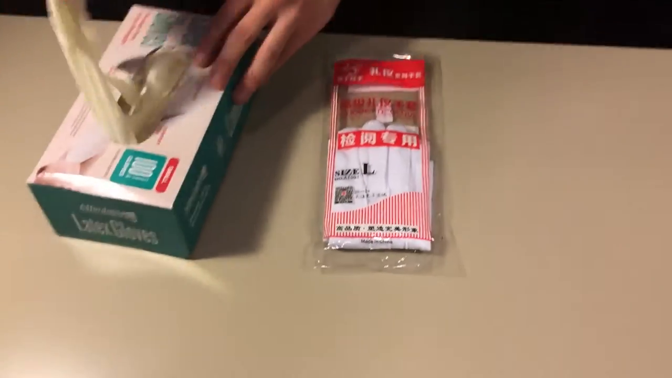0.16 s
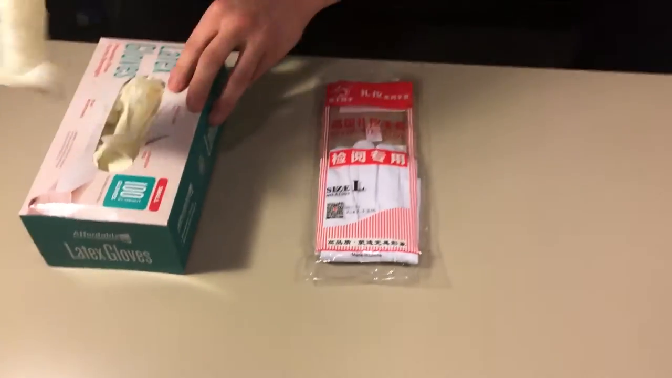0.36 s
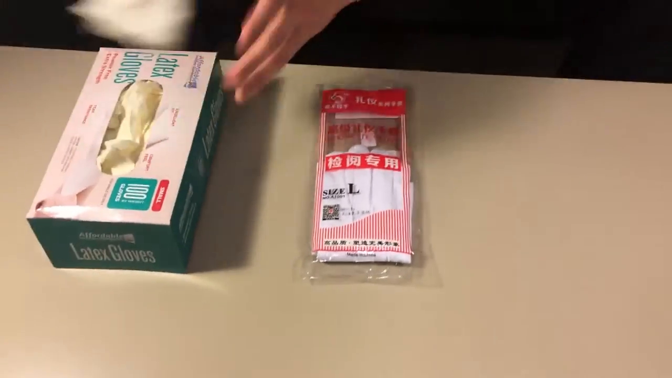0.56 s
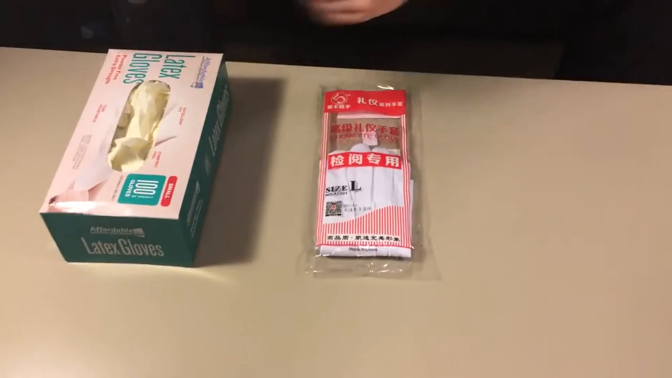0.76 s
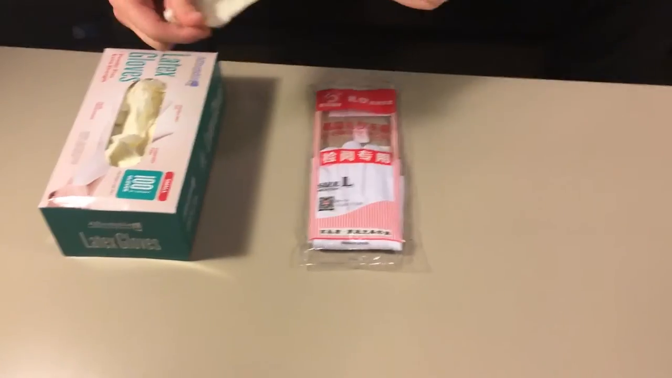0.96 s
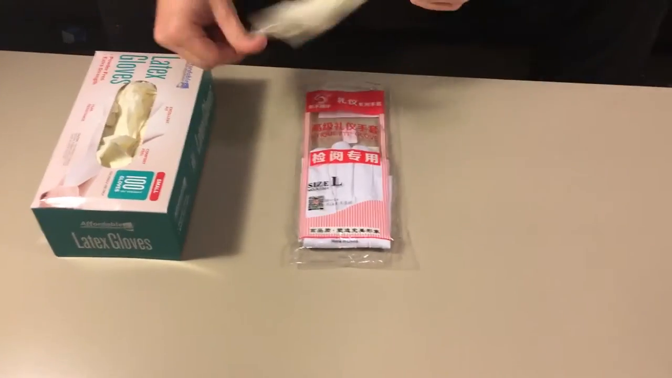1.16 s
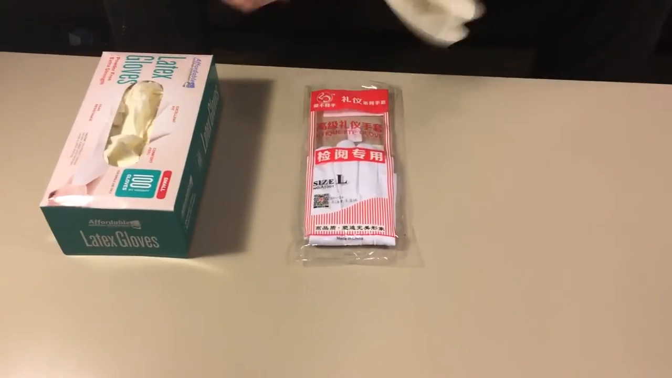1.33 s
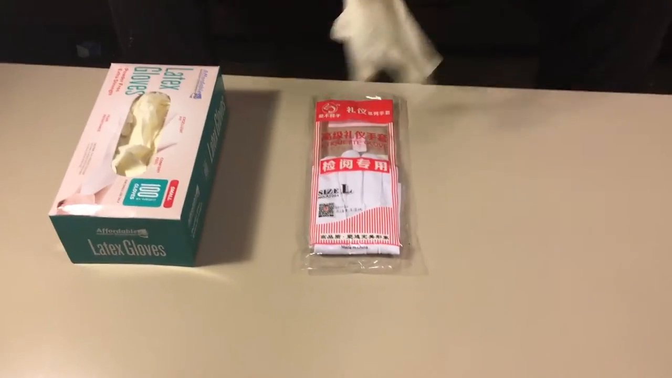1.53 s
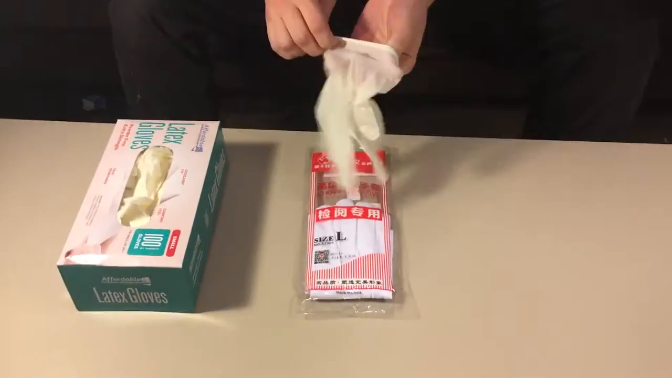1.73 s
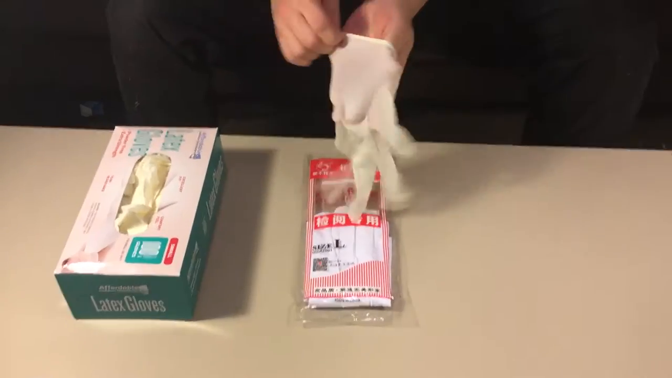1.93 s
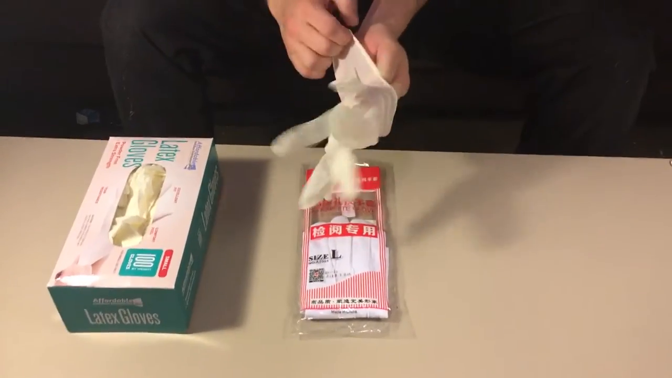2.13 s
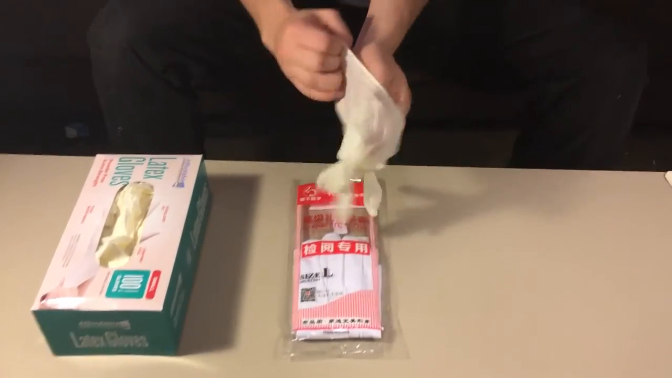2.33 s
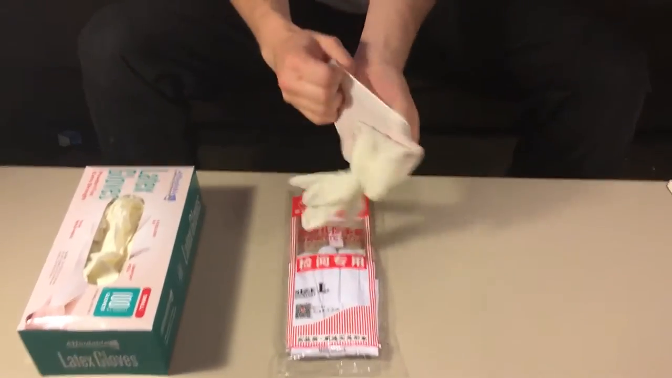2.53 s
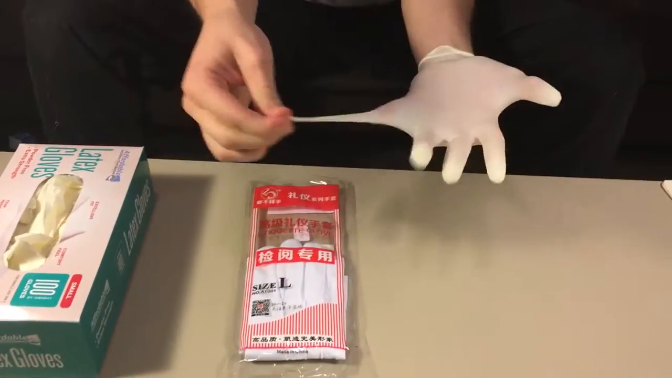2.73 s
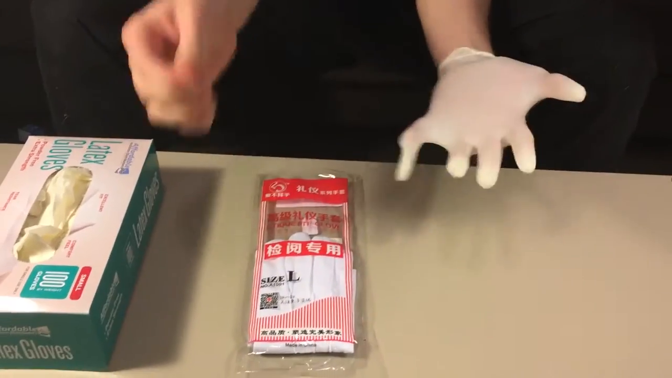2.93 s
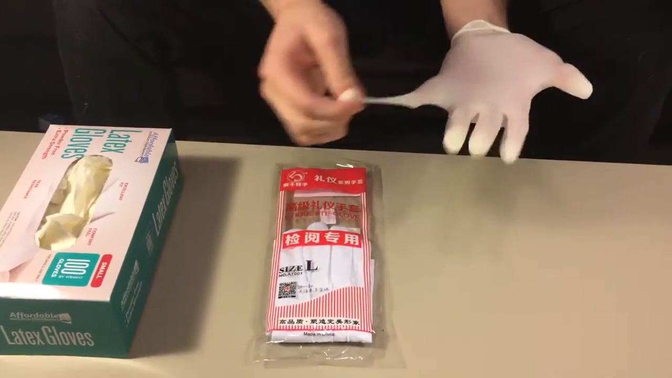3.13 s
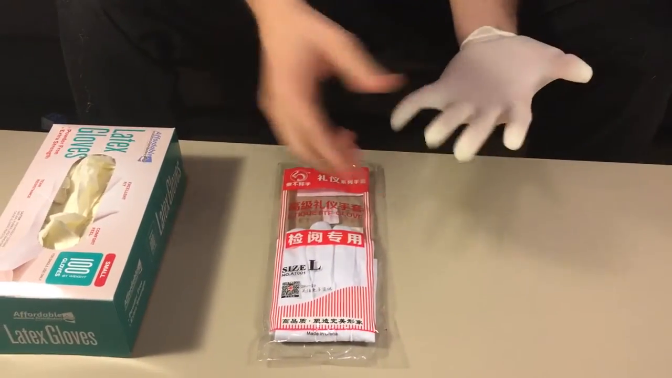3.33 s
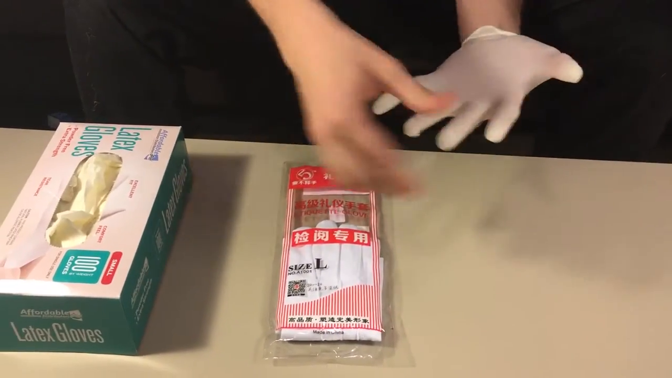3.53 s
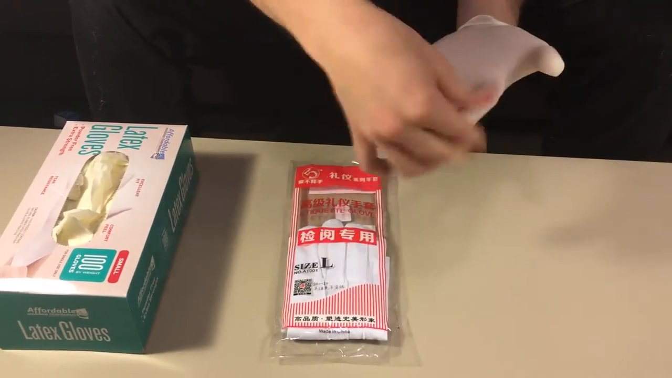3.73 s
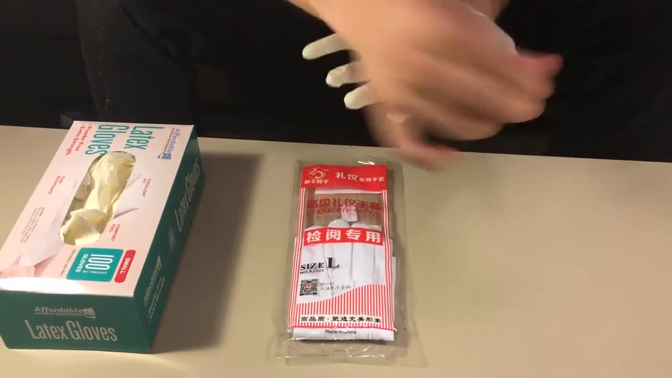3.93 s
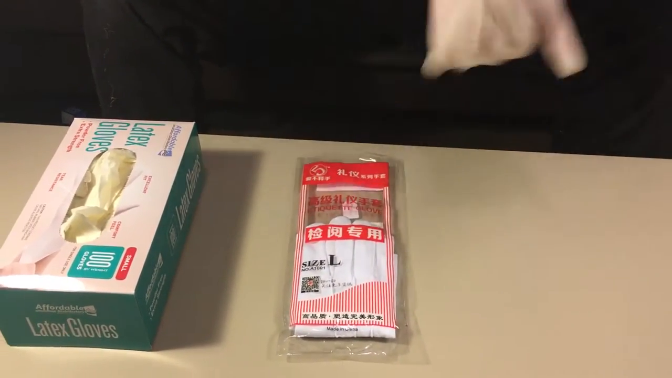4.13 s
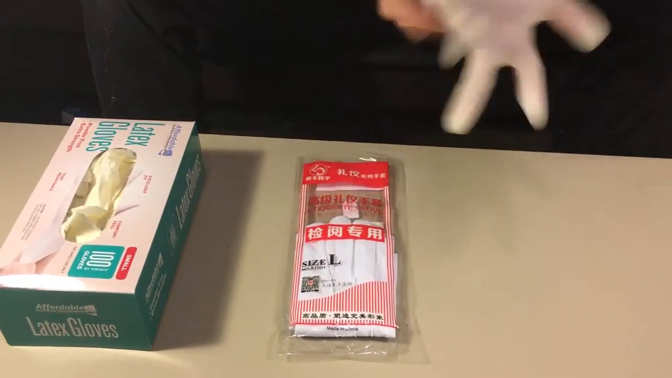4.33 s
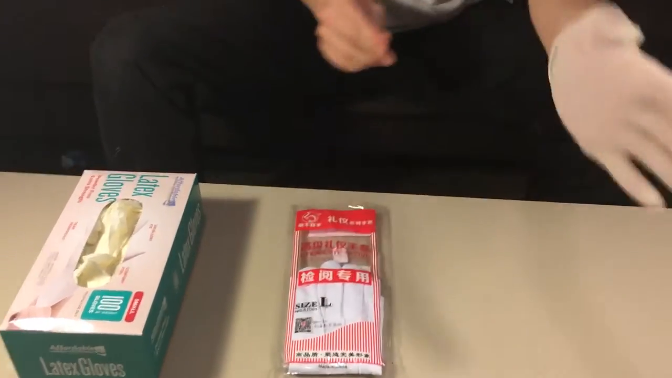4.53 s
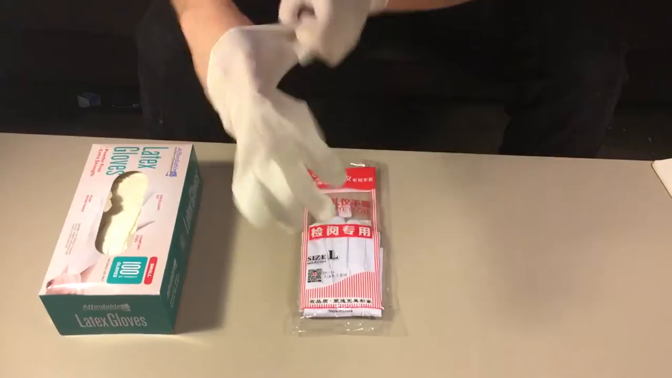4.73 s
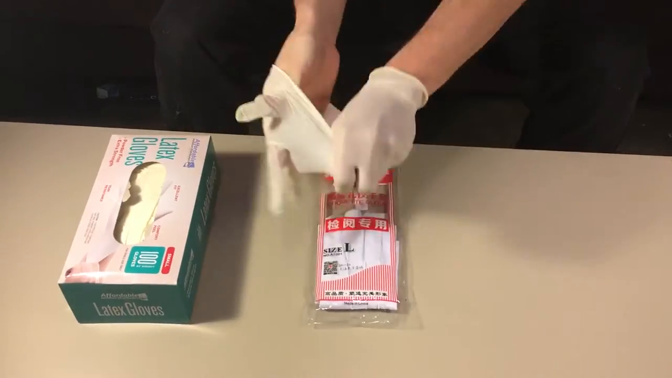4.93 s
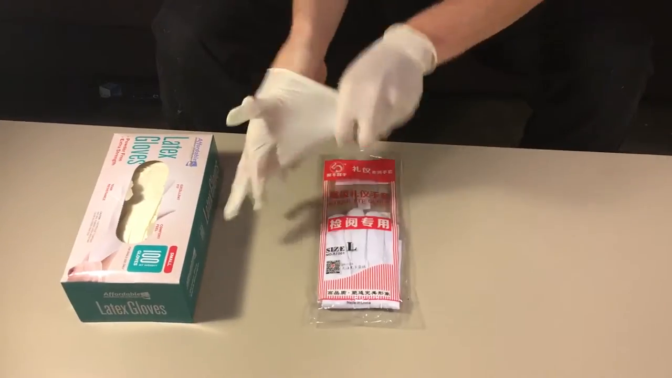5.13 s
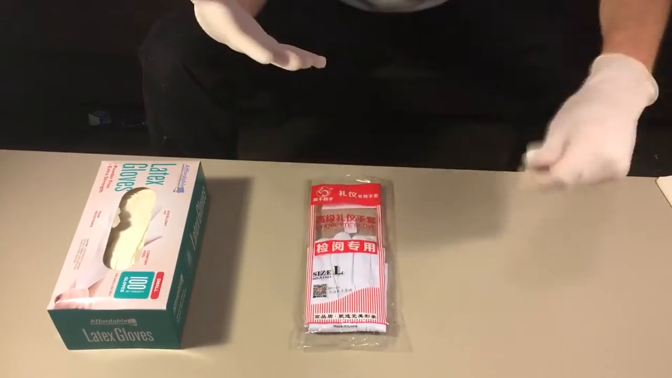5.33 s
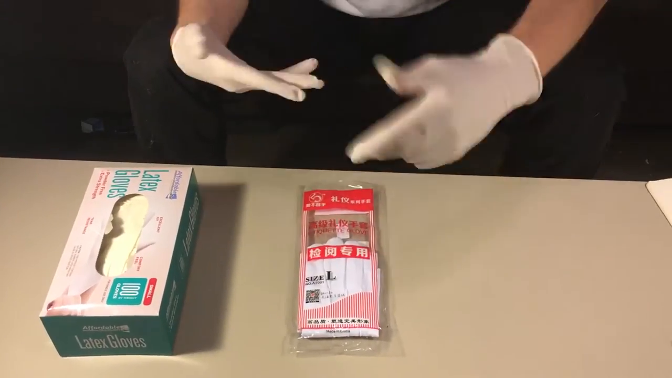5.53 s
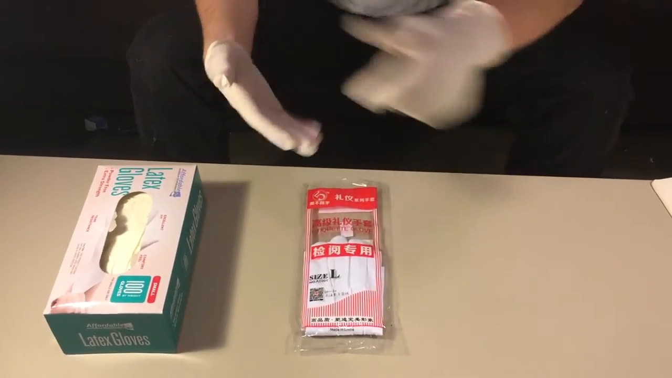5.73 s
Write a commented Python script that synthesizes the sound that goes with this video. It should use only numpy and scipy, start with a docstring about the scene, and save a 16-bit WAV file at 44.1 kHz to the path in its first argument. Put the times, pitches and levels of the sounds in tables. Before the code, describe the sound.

A quiet room holds a low, slightly wavering mains hum and faint air. From 0.1 to 0.3 s a latex glove drags out of a cardboard box in a growing rubbery rustle, ending in soft hollow flaps until 0.4 s. From 0.75 to 1.4 s only faint hissy brushes remain. Rubbing thickens from 1.6 s, with small flicks and the first moderate cracks at 2.1 and 2.3 s. A loud, sharp snap comes at 2.9 s, then a run at 3.3, 3.5, 3.7, 3.85, 4.0 and 4.2 s, some brighter. A very brief quickening creak near 4.5 s leads into the strongest, fullest snap. From 4.7 to 4.95 s slack rubber flaps and slaps in a dense flurry, followed by crisp snaps at 5.25, 5.35, 5.6 and 5.7 s. Everything is close, with a slight table reflection and a room ring that cuts off abruptly.

```python
"""In a quiet room with a low hum, latex gloves are first dragged from a cardboard box, rubbing and flapping.
Light brushes follow, then longer rubbing and the first snaps: stretched rubber cracks against skin.
A run of louder snaps comes next; a quickening creak leads to the strongest, then a burst of flaps and more snaps.
Blows are shaped bursts of noise, rubbing is a stream of tiny slips, and the hum is made of wavering sines.
A table top and the room send the sound back; the room's ring stops abruptly at set times."""
import sys
import numpy as np
from scipy import signal
from scipy.fft import rfft, irfft
from scipy.io import wavfile
from scipy.ndimage import uniform_filter1d

SR = 44100
rng = np.random.default_rng(int(sys.argv[2]) if len(sys.argv) > 2 else 0)


def wav_record(signal):
    """Record a signal, one row per channel, as 16-bit PCM in the file named by sys.argv[1]."""
    frames = np.transpose(np.atleast_2d(signal))
    bounded = np.clip(frames, -1, 1)
    # unit amplitude maps onto the largest positive 16-bit level
    quanta = np.round(bounded * 32767).astype(np.int16)
    wavfile.write(sys.argv[1], SR, quanta)


N = 254917  # samples in the whole scene
BLOW_SIZE, LEAD = 4096, 256  # samples in one blow, and those of them before it lands
BLOW_HZ = np.fft.rfftfreq(BLOW_SIZE, 1 / SR)


def gain_of(db):
    """Turns decibels into an amplitude factor."""
    return 10 ** (np.asarray(db) / 20)


def evened(x):
    """Scales a signal to an average strength (rms) of 1."""
    return x / np.sqrt(np.mean(x ** 2) + 1e-20)


def read(points, hz):
    """Reads a curve of (frequency, value) points, spacing frequencies as the ear does (log axis)."""
    point_hz, value = np.transpose(points)
    return np.interp(np.log(hz + 1), np.log(point_hz + 1), value)


def bell(hz, centre_hz, octaves):
    """Draws a rounded peak of height 1 over frequency."""
    return np.exp(-.5 * (np.log2((hz + 1) / centre_hz) / octaves) ** 2)


def coloured(x, points):
    """Filters a signal by a spectrum in dB, then scales it to rms 1."""
    spectrum_gain = gain_of(read(points, np.fft.rfftfreq(N, 1 / SR)))
    return evened(irfft(rfft(x) * spectrum_gain, N))


def wander(rate_hz):
    """Makes a slow random motion of rms 1 by keeping only the lowest frequencies of noise."""
    hz = np.fft.rfftfreq(N, 1 / SR)
    slow = rfft(rng.standard_normal(N)) / (1 + (hz / rate_hz) ** 4)
    return evened(irfft(slow, N))


def add(mix, s, sound):
    """Mixes in a blow that lands at time s."""
    start = max(round(s * SR) - LEAD, 0)
    part = mix[start:][:len(sound)]
    part += sound[:len(part)]


# Mains hum, one row per tone: (frequency [Hz], level [dB rms])
HUM_TONES = [(59.5, -51.5), (119, -57.5)]
# Relative spectrum of the rumble and air: (frequency [Hz], level [dB per Hz])
AIR_SPECTRUM = [(15, -23), (32, -14.5), (55, -5.5), (75, 3), (100, -16.5), (150, -14.5), (200, -14.5),
                (300, -23), (600, -26.5), (1500, -30.5), (4000, -49), (10000, -57), (16000, -55)]
AIR_DB = -51.5  # rms level of rumble and air together


def background():
    """Low rumble and faint air are filtered noise; the hum is sines whose phase wavers."""
    t = np.arange(N) / SR
    hum = np.zeros(N)
    for hz, db in HUM_TONES:
        phase = 2 * np.pi * hz * t + .8 * wander(rate_hz=2.5)
        hum += gain_of(db) * np.sqrt(2) * np.sin(phase)  # root 2 turns rms into peak height
    return hum + gain_of(AIR_DB) * coloured(rng.standard_normal(N), AIR_SPECTRUM)


# Starting tone of the room's ring: (frequency [Hz], relative level [dB])
ROOM_TONE = [(60, 17.5), (150, -1), (330, 6.5), (700, 3), (2000, 2.5), (4000, -0.5), (6500, 0.5),
             (10000, -1.5), (16000, -1.5)]
# How long the ring takes to fall by 60 dB: (frequency [Hz], decay time [s])
ROOM_DECAY = [(150, 0.51), (500, 0.56), (1400, 0.65), (3700, 0.64), (6500, 0.5), (10000, 0.43),
              (16000, 0.3)]
# Single wall echoes: (delay [s], level against the scattered ring as a whole [dB])
WALL_ECHOES = [(0.0212, -19), (0.03, -18), (.0375, -13)]


def room_response(first_s=0.00061, build_s=0.011):
    """Scattered reflections build up, then die band by band, with a few distinct wall echoes."""
    size = SR * 3 // 4
    reflections = rng.standard_normal(size) * (rng.random(size) < 12000 / SR)
    hz, t, bands = signal.stft(reflections, SR, nperseg=256)
    tone_db = read(ROOM_TONE, hz)[:, None]
    fall_db = 60 * t / read(ROOM_DECAY, hz)[:, None]
    ringing = signal.istft(bands * gain_of(tone_db - fall_db), SR, nperseg=256)[1][:size]
    since_first_s = np.maximum(np.arange(size) / SR - first_s, 0)
    ringing *= 1 - np.exp(-since_first_s / build_s)
    ringing /= np.linalg.norm(ringing)
    for delay_s, db in WALL_ECHOES:
        ringing[round(delay_s * SR)] += gain_of(db)
    return ringing


# Moments when the ring of the room stops dead: (time [s])
RING_STOPS = [.747, 1.413, 2.68, 3.18, 3.447, 3.613, 3.813, 3.98, 4.113, 4.413, 4.68, 4.88, 4.98, 5.313,
              5.513, 5.68]


def room(x):
    """Reflections ring on only until the next stop; each stretch draws its own reflections."""
    stretches = np.split(x, [round(s * SR) for s in RING_STOPS])
    rung = [signal.fftconvolve(part, room_response())[:len(part)] for part in stretches]
    return np.concatenate(rung)


def table_echo(x, echo_db=-7, thin_hz=200, dull_hz=2500):
    """The table top throws back a copy about 3 ms later, short of bass and treble."""
    hz = np.fft.rfftfreq(N, 1 / SR)
    delayed = np.exp(-2j * np.pi * hz * .003)
    reflected = hz ** 2 / (hz ** 2 + thin_hz ** 2) / (1 + 1j * hz / dull_hz)
    return irfft(rfft(x) * (1 + gain_of(echo_db) * reflected * delayed), N)


GRIP_S, SLACKEN_S = 0.0027, 0.021  # rise time of a pull, and the time constant of its dying away
BRUSH_S = 0.015  # spread of a brush to either side of its middle (one standard deviation)
RESTING_DB, RESTING_FOLDS_DB = -67.5, -5.5  # the hands are never quite still; folds against hiss


def pull(start_s, end_s, db, growth_db):
    """A drag takes hold, grows with tension (or eases if growth is negative), then slackens."""
    t = np.arange(N) / SR
    tension = np.clip((t - start_s) / (end_s - start_s), 0, 1)
    taking_hold = np.clip((t - start_s) / GRIP_S, 0, 1)
    slackening = np.exp(-np.maximum(t - end_s, 0) / SLACKEN_S)
    return taking_hold * slackening * gain_of(db + growth_db * (tension - 1))


def brush(s, db):
    """Loose rubber passes the fingers lightly: a short, even rise and fall in loudness."""
    return gain_of(db) * np.exp(-.5 * ((np.arange(N) / SR - s) / BRUSH_S) ** 2)


# Glove dragged over card or skin, levels before the final mix: (start [s], end [s], final level [dB],
#   growth [dB], folds against hiss [dB])
DRAGS = [ (0.075, 0.304, -42, 22.5, 3.5), (0.325, 0.391, -47, -4, 0), (0.43, 0.61, -61.5, 13, -6),
         (0.751, 1.387, -63, -3.5, -10), (1.575, 2.67, -57.5, 8.5, 1.5), (1.856, 2.12, -59.5, -2, 2.5),
         (3.255, 3.29, -59.5, 12, 5), (3.435, 4.12, -55.5, 1, 1), (4.122, 4.238, -45, 14, 4.5),
         (4.478, 4.535, -46, 11, 9), (4.677, 4.957, -49.5, 2, 3.5), (4.973, 5.203, -77, -8.5, 16),
         (5.214, 5.242, -48.5, 12, -21), (5.318, 5.355, -52, 1, -12), (5.663, 5.725, -58.5, -4, 2), ]
# Loose rubber brushing past the fingers, before the final mix: (middle time [s], level [dB],
#   folds against hiss [dB])
LIGHT_TOUCHES = [ (0.03, -55.5, -6), (0.774, -59.5, 3), (0.825, -54.5, -8), (0.935, -47.5, -8),
                 (1.005, -54.5, -11), (1.09, -54, -10), (1.17, -51.5, -12), (1.255, -53, -9),
                 (1.37, -59.5, -15), (1.76, -58.5, 6.5), (1.84, -55, 3), (2.454, -51.5, 9),
                 (2.61, -54.5, 0), ]


def sliding():
    """Loudness of hiss and folds over time: the power of all hand movements adds up."""
    moves = [(pull(*row), folds_db) for *row, folds_db in DRAGS]
    moves += [(brush(*row), folds_db) for *row, folds_db in LIGHT_TOUCHES]
    moves += [(gain_of(RESTING_DB), RESTING_FOLDS_DB)]
    hiss_power = sum(level ** 2 for level, _ in moves)
    folds_power = sum((level * gain_of(folds_db)) ** 2 for level, folds_db in moves)
    return np.sqrt(hiss_power), np.sqrt(folds_power)


def friction(spectrum, slips_per_s, spread_db, smooth_db, surge_db):
    """Rubber sticks and lets go in tiny uneven slips over a smooth hiss, coming in surges."""
    sizes = gain_of(spread_db * np.minimum(rng.exponential(1, N), 4))
    happens = rng.random(N) < slips_per_s / SR
    slips = evened(sizes * rng.choice([-1, 1], N) * happens)
    drive = slips + gain_of(smooth_db) * rng.standard_normal(N)
    surges = gain_of(surge_db * wander(rate_hz=20))
    return coloured(drive * surges, spectrum)


# Relative spectrum of the sliding surface: (frequency [Hz], level [dB per Hz])
HISS_SPECTRUM = [(1200, -40), (2500, -9), (4000, 2.5), (6500, -2.5), (9000, -1), (12000, -4), (16000, -11)]
# Relative spectrum of the rustling folds: (frequency [Hz], level [dB per Hz])
FOLD_SPECTRUM = [(80, -4), (200, 1), (350, 6), (600, -1), (1100, -1.5), (2100, 2), (3000, -11),
                 (6000, -7.5), (16000, -55)]
# Relative spectrum of small ticking creases: (frequency [Hz], level [dB per Hz])
CREASE_SPECTRUM = [(200, -16), (1000, -5.5), (3500, 8.5), (8000, 0), (16000, -14)]
CREASES_DB = -9  # creases against hiss


def rubbing():
    """The surface hisses as it slides; loose folds rustle lower down and small creases tick."""
    hiss_level, folds_level = sliding()
    hiss = friction(HISS_SPECTRUM, slips_per_s=1200, spread_db=6, smooth_db=6.0, surge_db=2.0)
    folds = friction(FOLD_SPECTRUM, slips_per_s=460, spread_db=-0.5, smooth_db=-8.5, surge_db=3.5)
    creases = friction(CREASE_SPECTRUM, slips_per_s=98, spread_db=4, smooth_db=-25, surge_db=0.0)
    surface = hiss + gain_of(CREASES_DB) * creases
    return surface * hiss_level + folds * folds_level


def at_level(sound):
    """Fades the ends of a blow and scales it to the energy of rms 1 lasting 10 ms."""
    sound = np.roll(sound, LEAD) * signal.windows.tukey(BLOW_SIZE, .04)
    return sound * np.sqrt(SR / 100 / np.sum(sound ** 2))


def blow(length_ms, colour_db, lag_cycles, shiver_db, shiver_ms, whip_db=-19, whip_ms=1.18, shiver_hz=5000):
    """Rubber whips through the air, lands in a quick run of contacts and shivers out."""
    # time runs from the landing; the moments before it sit at the end of the array
    ms = np.roll(np.arange(BLOW_SIZE) - LEAD, -LEAD) * 1000 / SR
    whip = gain_of(whip_db) * np.exp(-abs(ms) / whip_ms)
    landing = np.where(ms < 0, whip, np.exp(-(ms / length_ms) ** 4))
    shiver = (ms >= 0) * gain_of(shiver_db) * np.exp(-abs(ms) / shiver_ms)
    hard, soft = rfft(rng.standard_normal((2, BLOW_SIZE)) * [landing, shiver])
    # the lossy rubber keeps little treble after the contacts
    contacts = hard + soft / (1 + 1j * BLOW_HZ / shiver_hz)
    # even out the broad spectrum, so that the colour alone sets it
    contacts /= np.sqrt(uniform_filter1d(abs(contacts) ** 2, size=90) + 1e-9)
    # low notes travel more slowly across the sheet and arrive late
    lag = np.exp(-2j * np.pi * lag_cycles * np.log1p(BLOW_HZ / 250))
    return at_level(irfft(contacts * lag * gain_of(colour_db)))


def flap(length_ms, bright_db, ring_hz, ring_db):
    """A softer blow with one broad ring, falling in pitch as the slack sheet settles."""
    tilt_db = bright_db * np.log2((BLOW_HZ + 60) / 1000)
    fold_db = ring_db * bell(BLOW_HZ, ring_hz, octaves=0.29)
    treble_loss = 1 + (BLOW_HZ / 11000) ** 4
    bass_loss = 1 + (230 / (BLOW_HZ + 1)) ** 4
    colour_db = tilt_db + fold_db - 10 * np.log10(treble_loss * bass_loss)
    return blow(length_ms, colour_db, lag_cycles=1.832, shiver_db=-1, shiver_ms=4.3)


CREAK_START_S, CREAK_END_S = 4.466, 4.506
CREAK_FIRST_PER_S, CREAK_LAST_PER_S = 54, 170  # slips per second
CREAK_DB, CREAK_GROWTH_DB = -38.5, 13  # final level before the mix, and the growth up to it


def creak(slip_ms=0.42, bright_db=0, ring_hz=1300, ring_db=6):
    """The cuff, drawn tight, sticks and slips in ticks that quicken and grow with the tension."""
    t = np.arange(CREAK_START_S, CREAK_END_S, 1 / SR)
    tension = np.linspace(0, 1, len(t))
    slips_per_s = CREAK_FIRST_PER_S + (CREAK_LAST_PER_S - CREAK_FIRST_PER_S) * tension
    slip_count = np.floor(np.cumsum(slips_per_s) / SR)
    out = np.zeros(N)
    for i in np.flatnonzero(np.diff(slip_count)):
        level = gain_of(CREAK_DB + CREAK_GROWTH_DB * (tension[i] - 1))
        add(out, t[i], level * flap(slip_ms, bright_db, ring_hz, ring_db))
    return out


# a smaller fold rings higher and flaps brighter: its tilt is flat at this ring [Hz]
# and grows with each octave of ring [dB per octave]
FLAT_FOLD_HZ, TILT_PER_OCTAVE = 3200, 1.22
# Slack rubber flicking, popping or slapping, plus (at 4.953 s) a faint repeat of the 4.92 s snap, levels before
# the final mix: # (time [s], level [dB], length [ms], ring of the fold [Hz], lift of the ring [dB])
SLACK_FLAPS = [ (0.168, -44, 3.5, 2200, -2), (0.326, -35.5, 2.4, 2600, -5), (0.337, -34, 9.7, 403, 13),
               (0.381, -31.5, 4.4, 388, 8), (0.401, -32.5, 2.7, 427, 16.5), (0.578, -49.5, 6.7, 490, 16),
               (0.636, -51.5, 1.8, 400, 25), (1.124, -46, 2.5, 4600, 18), (1.292, -49.5, 1.5, 5660, 12),
               (1.322, -48.5, 1.4, 6860, 5), (1.727, -48.5, 1.8, 1510, 11), (1.795, -44.5, 2.2, 630, 13.5),
               (1.979, -36.5, 13.3, 1880, 11), (2.058, -33.5, 5.6, 3800, 17), (2.282, -47.5, 1.5, 9400, 9),
               (2.336, -29, 2.5, 2040, 4), (4.121, -32, 6.5, 1590, 3), (4.129, -37, 13, 200, 24),
               (4.164, -38.5, 6.8, 1260, 8), (4.541, -27.5, 19, 176, 23), (4.7225, -22, 2.8, 1230, 10),
               (4.726, -32.5, 5.9, 380, 20), (4.763, -26.5, 4, 1440, 13), (4.774, -25.5, 7.1, 400, 13),
               (4.81, -21.5, 3.5, 1090, 6.5), (4.814, -24, 4, 343, -3), (4.828, -28.5, 8.1, 1760, 17),
               (4.845, -33, 3.3, 1930, 26), (4.855, -34, 3.5, 1860, 8), (4.901, -30, 1.8, 1250, 18.5),
               (4.953, -33, 6.1, 1780, 8.5), (5.168, -43.5, 1.8, 1320, 18.5),
               (5.2413, -20.5, 2.7, 2650, 14), (5.323, -40, 2.9, 4800, 9), ]


def flaps():
    """Slack rubber flicks, pops and slaps, each fold with its own ring; the row at 4.953 s is a faint repeat of
    the 4.92 s snap."""
    out = np.zeros(N)
    for s, db, length_ms, ring_hz, ring_db in SLACK_FLAPS:
        bright_db = TILT_PER_OCTAVE * np.log2(ring_hz / FLAT_FOLD_HZ)
        add(out, s, gain_of(db) * flap(length_ms, bright_db, ring_hz, ring_db))
    return out


def ring(centre_hz, octaves=0.28, dip_share=0.18, dip_ratio=1.54):
    """A taut membrane favours one pitch (a mode), with a weak spot (antiresonance) above it."""
    peak = bell(BLOW_HZ, centre_hz, octaves)
    return peak - dip_share * bell(BLOW_HZ, centre_hz * dip_ratio, octaves)


def wrinkles():
    """A wrinkled sheet has many weak modes: a random ripple over frequency."""
    ripple = evened(uniform_filter1d(rng.standard_normal(90), size=2))
    return np.interp(np.sqrt(BLOW_HZ), np.linspace(0, np.sqrt(SR / 2), len(ripple)), ripple)


# Basic relative spectrum of a crack: (frequency [Hz], level [dB per Hz])
CRACK_SPECTRUM = [(40, -14.5), (130, -7), (310, -2.5), (520, -4), (850, 0), (1200, -1), (2000, 0.5),
                  (4000, -0.5), (9000, 0.5), (12000, -2.5), (16000, -11.5)]


def snap(length_ms, thump_db, bright_db, low_hz, low_db, high_hz, high_db, far_thump=0.5, radiate_hz=1150):
    """A crack with two membrane rings over the thump of the hand: (heard near, sent into the room)."""
    crack_db = read(CRACK_SPECTRUM, BLOW_HZ)
    crack_db += bright_db * np.log2(np.maximum(BLOW_HZ / 1000, 1))  # tilts only above 1000 Hz
    crack_db += 1.4 * wrinkles()
    rings_db = low_db * ring(low_hz) + high_db * ring(high_hz)
    flesh_db = thump_db / (1 + (BLOW_HZ / 600) ** 2)
    near_db = crack_db + rings_db + flesh_db
    near = blow(length_ms, near_db, lag_cycles=0.46, shiver_db=2.0, shiver_ms=2.68)
    # a small membrane radiates its high rings best; low rings and the thump carry less far
    far_rings = 1.3 * BLOW_HZ ** 2 / (BLOW_HZ ** 2 + radiate_hz ** 2)
    far_db = crack_db + far_rings * rings_db + far_thump * flesh_db
    return near, at_level(irfft(gain_of(far_db)))


# bright cracks and long ones carry further into the room; a thump into the flesh stays near
SEND_DB, SEND_DB_PER_DOUBLING = -11.5, 0.79  # base level; extra for each doubling of the length in ms
SEND_PER_BRIGHT, SEND_PER_THUMP = .6, -0.046  # dB per dB/octave of brightness; dB per dB of thump
# Stretched rubber let go, levels before the final mix: (time [s], level [dB], crack length [ms],
#   thump of the flesh [dB], brightness [dB per octave], low ring of the membrane [Hz], its lift [dB],
#   high ring [Hz], its lift [dB])
STRETCHED_SNAPS = [ (2.127, -22.5, 1.44, 7, -0.8, 2030, 7.5, 9100, 1),
                   (2.3283, -21, 2.2, -5.5, -2, 2060, 12, 5300, 6.5),
                   (2.941, -13, 4.1, 4.5, 0.06, 1250, 6, 4860, 5.5),
                   (3.298, -13, 1.35, 2.5, -0.87, 1730, 5.5, 3250, 7),
                   (3.5195, -14, 0.82, 6.5, 0.7, 1630, 1, 4720, 8.5),
                   (3.676, -12, 1.45, 3, 0.1, 2530, 2.5, 4400, 10.5),
                   (3.8508, -11.5, 1.6, -3, 1.5, 3980, 10.5, 6700, 6),
                   (4.0213, -17, 1.15, 7, 0.4, 4520, 8.5, 7250, 5.5),
                   (4.2378, -13, 1.4, -14, 1, 1750, 2.5, 2950, 5),
                   (4.5206, -8, 9.2, 6, -1, 900, 2, 1600, 0),
                   (4.9219, -17, 2.3, 15, 5.5, 1990, 13.5, 11000, 0.5),
                   (5.249, -14, 2.6, 6.5, 0, 1250, 5, 3830, 8),
                   (5.3583, -14.5, 2.2, 18, 3.5, 1160, 11.5, 8400, 4.5),
                   (5.5766, -12.5, 1.9, 2, 2.5, 4480, 4.5, 7950, 4.5),
                   (5.731, -13, 3.2, 20.5, 2, 6360, -0.5, 8300, 4.5), ]


def snaps():
    """Stretched rubber is let go against skin: (direct sound, sound sent into the room)."""
    direct, sent = np.zeros(N), np.zeros(N)
    for s, db, length_ms, thump_db, bright_db, *rings in STRETCHED_SNAPS:
        near, far = snap(length_ms, thump_db, bright_db, *rings)
        send_db = SEND_DB + SEND_PER_BRIGHT * bright_db
        send_db += SEND_DB_PER_DOUBLING * np.log2(length_ms) + SEND_PER_THUMP * thump_db
        add(direct, s, gain_of(db) * near)
        add(sent, s, gain_of(db + send_db) * far)
    return direct, sent


def scene():
    """Snaps, flaps and rubbing are heard directly, off the table and through the room."""
    direct, sent = snaps()
    handling = rubbing() + creak() + flaps()
    near = table_echo(gain_of(0.64) * direct + gain_of(-0.5) * handling)
    far = room(gain_of(-0.7) * sent + gain_of(-15.0) * handling)
    return (near + far + background())[None]


# Narrow dip in the treble, a single row: (centre [Hz], width [octaves], depth [dB])
TREBLE_DIP = (10400, .025, -9)
EDGE_HZ = 16000  # upper band limit


def record(dry):
    """One narrow treble band dips, overload rounds off the loudest peaks, then the top is cut off."""
    hz = np.fft.rfftfreq(N, 1 / SR)
    dip_hz, dip_octaves, dip_db = TREBLE_DIP
    heard = irfft(rfft(dry) * gain_of(dip_db * bell(hz, dip_hz, dip_octaves)), N)
    rounded = heard / (1 + (heard / .97) ** 6) ** (1 / 6)
    low_pass = signal.firwin(255, EDGE_HZ, window=("kaiser", 8), fs=SR)
    return signal.oaconvolve(rounded, low_pass[None], "same")


dry = scene()
out = record(dry)
wav_record(out)
```